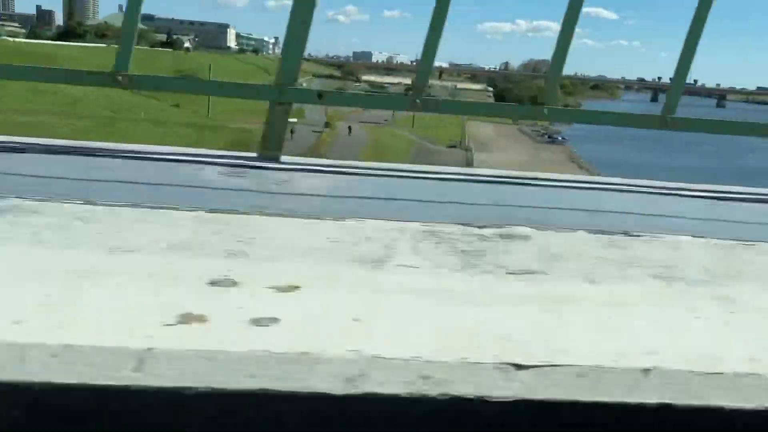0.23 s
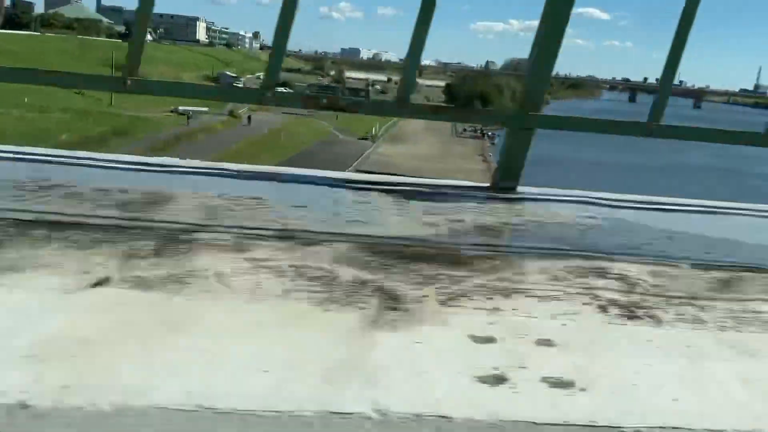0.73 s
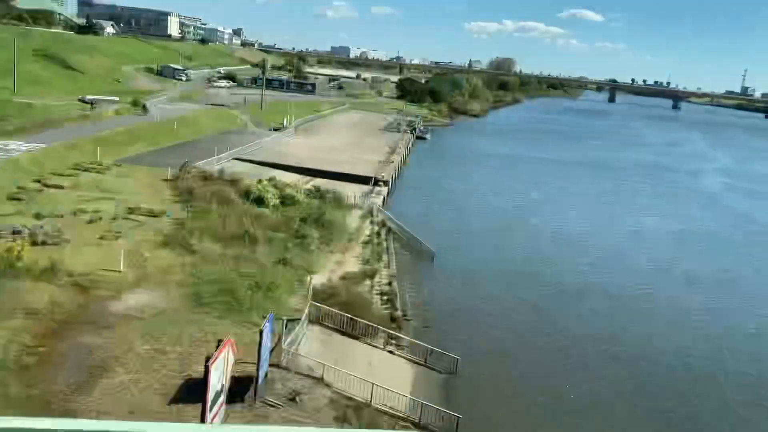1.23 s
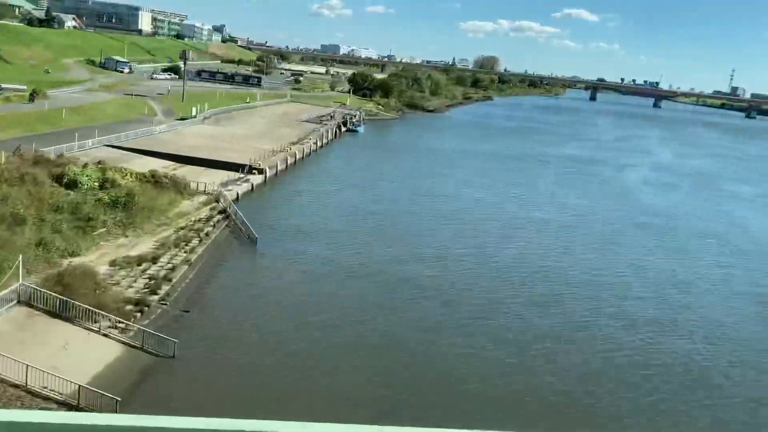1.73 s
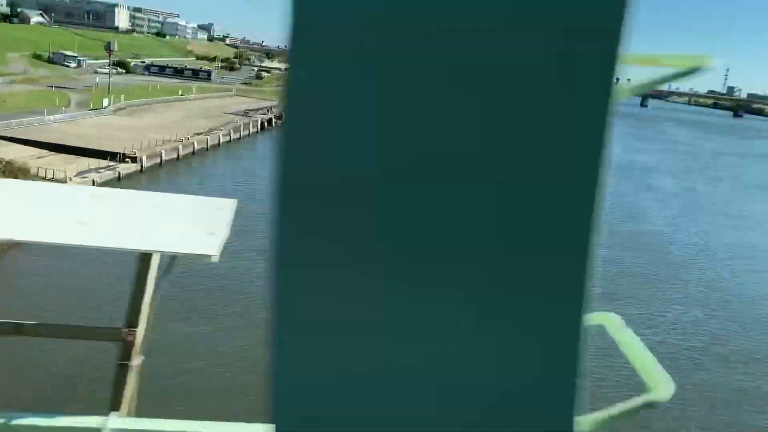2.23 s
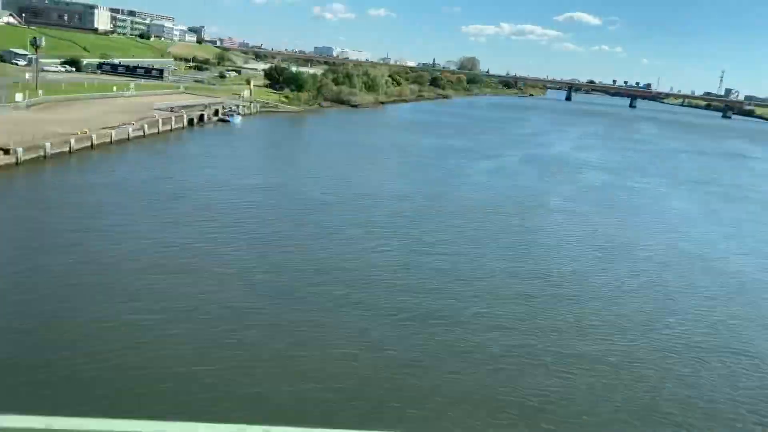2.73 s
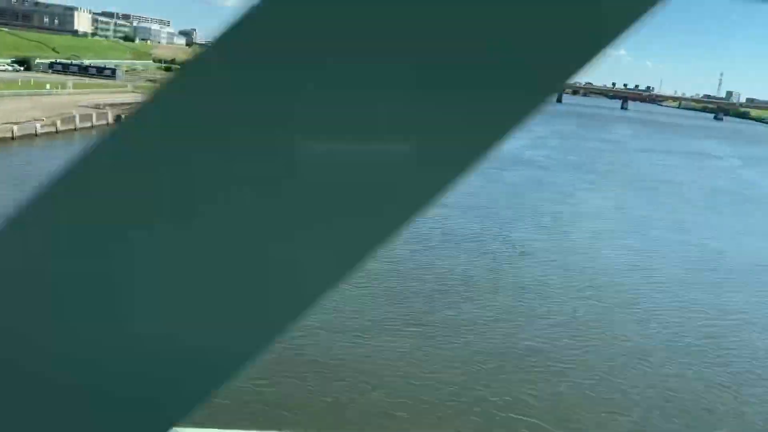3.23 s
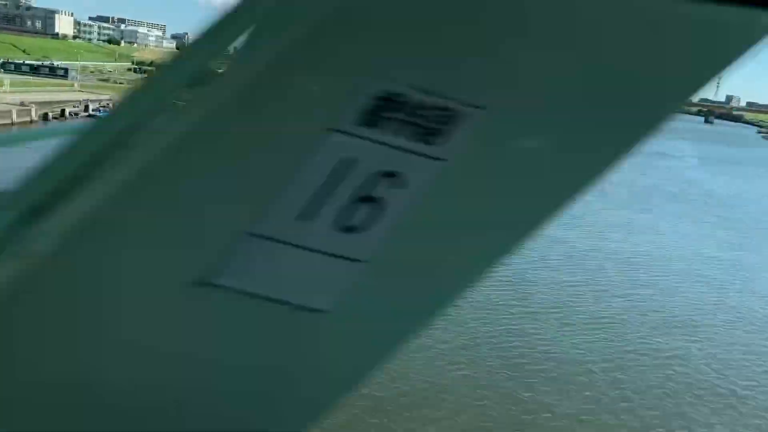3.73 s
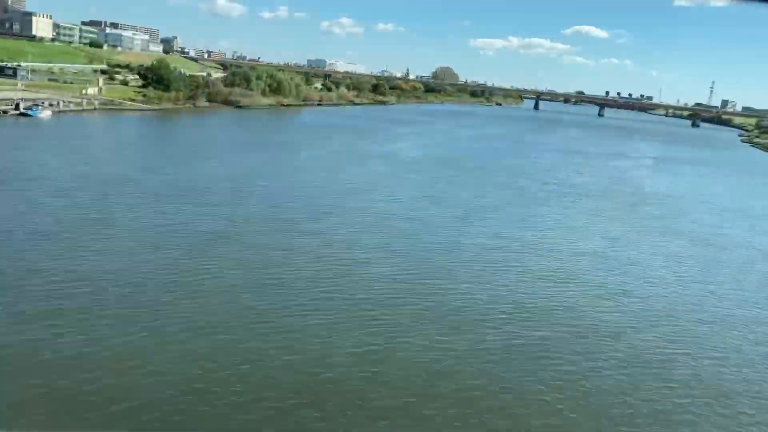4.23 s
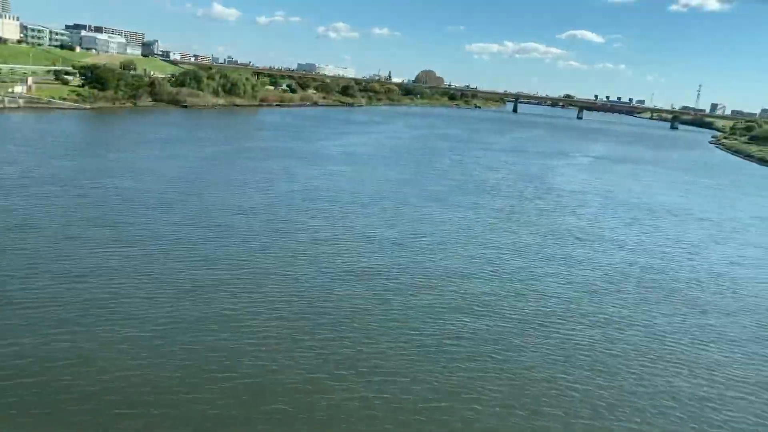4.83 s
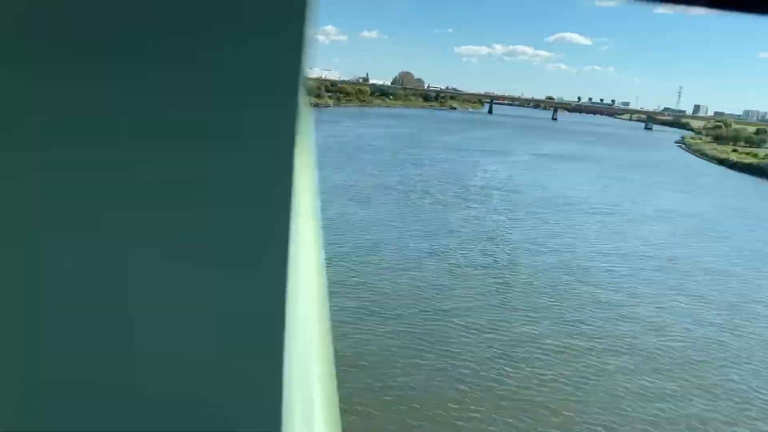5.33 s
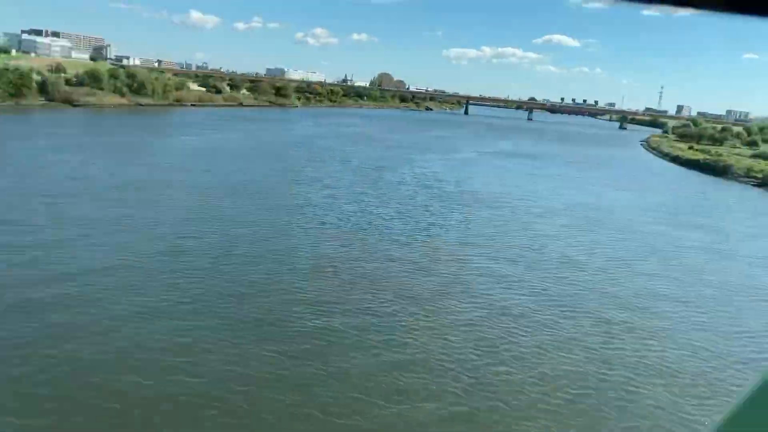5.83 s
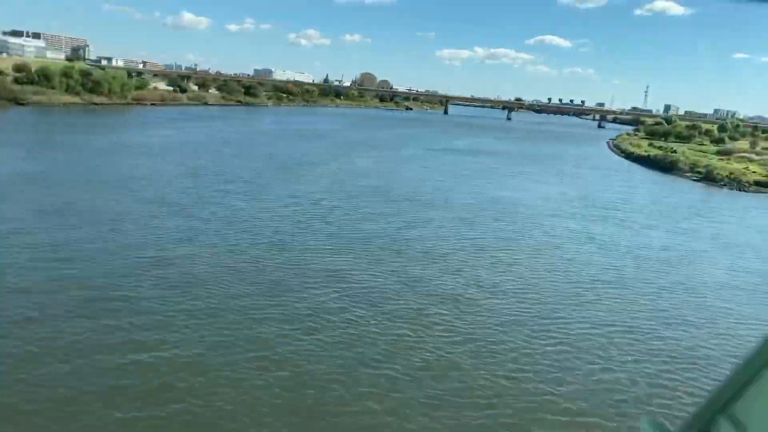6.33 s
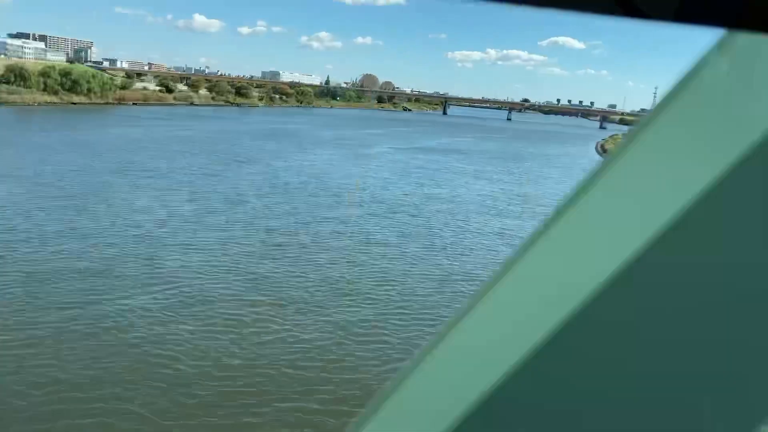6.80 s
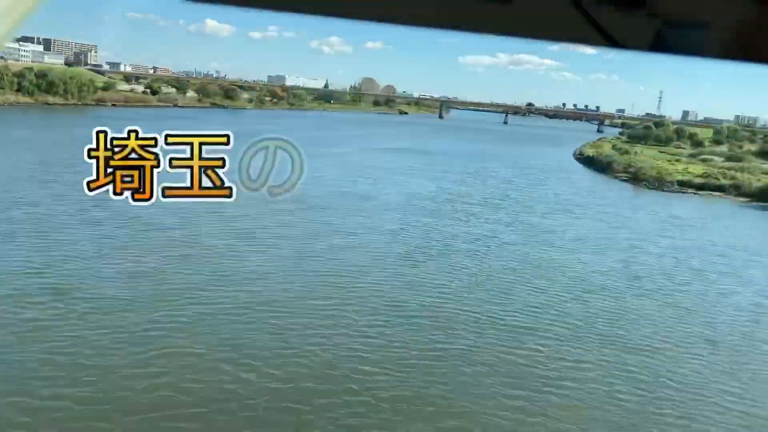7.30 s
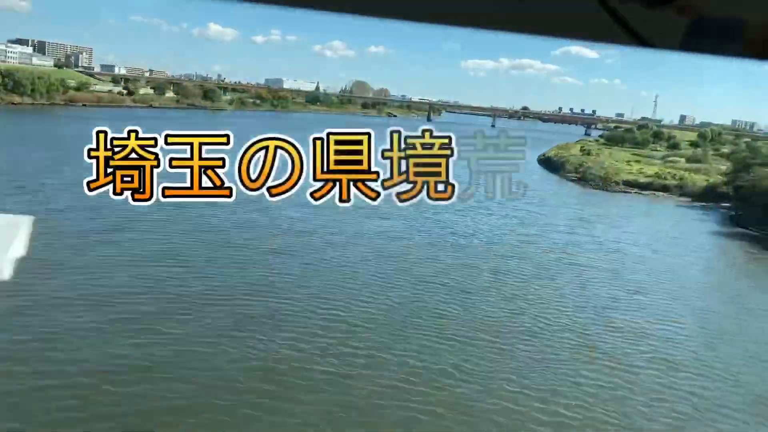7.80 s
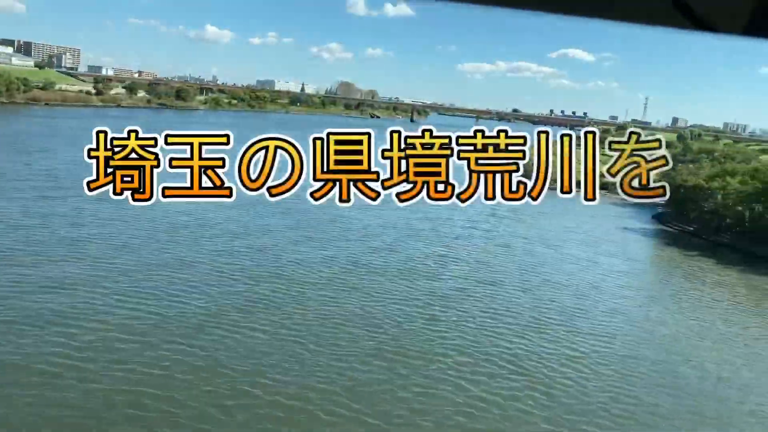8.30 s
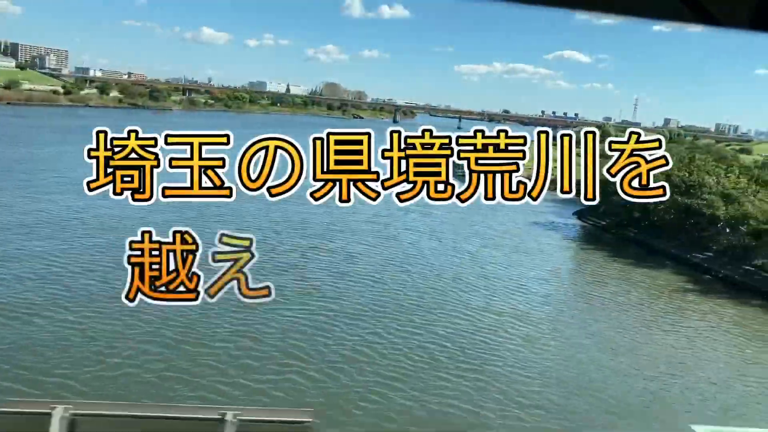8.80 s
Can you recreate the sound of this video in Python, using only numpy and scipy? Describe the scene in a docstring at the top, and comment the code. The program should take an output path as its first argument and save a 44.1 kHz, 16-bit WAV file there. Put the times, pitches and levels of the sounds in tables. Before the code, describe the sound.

Inside a train crossing a steel bridge: loud deep rumble, paired heavy wheel thumps over rail joints, clattering metal and ringing girders throughout.

```python
"""Train on a steel truss bridge

Heard inside the carriage by a two-port microphone: wheels roll on rough rail and shake girders and car body,
as noise shaped in narrow bands. Axles strike the rail joints, and the steelwork fills with each blow and rings on;
damped sines give panel knocks, booms, jolts and soft tonal swells; noise bursts in resonators give clatter.
Now and then a thin hiss rises in the treble, as gliding narrow bands of noise."""
import sys
import numpy as np
from scipy import signal
from scipy.fft import rfft, irfft, next_fast_len
from scipy.io import wavfile
from scipy.ndimage import uniform_filter1d, map_coordinates

SR = 44100
rng = np.random.default_rng(int(sys.argv[2]) if len(sys.argv) > 2 else 0)


def transcribe(u):
    """Save the signal u as a 16-bit wav file named by the first command-line argument.

    u: samples, shape (n,) or (channels, n), limited to [-1, 1]; the rate is SR.
    q: integer samples, one column per channel.
    """
    v = np.clip(np.atleast_2d(u).T, -1, 1)
    q = np.round(v * 32767).astype(np.int16)
    wavfile.write(sys.argv[1], SR, q)


def to_linear_factor(level_db):
    """Convert decibel levels (scalar or array-like) to linear amplitude factors."""
    exponent = np.asarray(level_db, float) / 20
    return 10 ** exponent


N = 399295

# bands of car body, girders, deck, rails, wheel treads, fittings: low_hz, high_hz
PARTS = np.array([(40, 90), (90, 180), (200, 500), (700, 1600), (2500, 6000), (9800, 12000)])
# axles over rail joints: start_s, thud_db, crack_db, fittings_rattle_db
JOINTS = [(0.031, -22, -47.5, -55.5), (0.1293, -19, -43, -59.5), (0.5946, -19.5, -40, -52),
          (0.679, -18.5, -50, -58.5), (0.738, -49, -41, -59), (0.848, -35, -46, -58),
          (1.027, -14.5, -44, -55), (1.117, -14, -44, -50.5), (1.587, -17, -39.5, -54),
          (1.6866, -36, -43, -60.5), (1.868, -28.5, -50.5, -62), (1.961, -21.5, -65, -71),
          (2.0674, -17.5, -45.5, -60), (2.15, -14, -42.5, -55), (2.6212, -14, -38, -56),
          (2.717, -17.5, -40, -56), (2.883, -24.5, -48.5, -64), (2.979, -19.5, -48.5, -68),
          (3.0945, -17, -45, -57), (3.1801, -19.5, -40, -54), (3.646, -14.5, -42, -55),
          (3.75, -49, -46, -58.5), (4.13, -15.5, -43, -56.5), (4.209, -19, -42, -54.5),
          (4.6811, -14.5, -41.5, -60), (4.7698, -21, -44, -60), (4.955, -18.5, -48, -71),
          (5.0545, -20.5, -51, -76), (5.1548, -35, -40, -62), (5.237, -15.5, -39.5, -56),
          (5.7154, -15, -38.5, -60), (5.8094, -15.5, -42.5, -58), (5.9935, -24, -44, -75),
          (6.189, -14, -40.5, -63), (6.278, -14, -40, -57), (6.6974, -27, -45, -63.5),
          (6.752, -16.5, -37.5, -53.5), (6.8457, -21, -41, -60.5), (7.017, -30.5, -46, -65),
          (7.164, -21, -49, -71), (7.244, -18, -44, -61), (7.321, -18, -44, -61),
          (7.796, -18.5, -38.5, -57.5), (7.888, -20.5, -44, -64), (8.058, -24, -48, -59),
          (8.28, -16.5, -39, -51.5), (8.363, -17.5, -36.5, -51), (8.738, -19, -53.5, -69),
          (8.845, -14, -35, -49), (8.947, -20.5, -40, -54.5)]
# spectral slope of the steelwork: pitch_hz, density_db (per Hz, relative)
STEEL = [(25, -3), (36, -5.5), (52, 6.5), (100, 1), (200, -6.5), (420, -9.5), (540, -12.5), (1000, -21),
         (1500, -28), (2200, -31), (3200, -38.5), (5000, -41.5), (6500, -46.5), (9000, -45.5),
         (12000, -50.5), (14500, -62), (16000, -74)]
# broad resonances of the steelwork: pitch_hz, width_hz, peak_db
GIRDER_PEAKS = [(62, 32, 5), (136, 49, 7.5), (245, 57, 3), (417, 10.6, 3), (4230, 1400, 4.5)]
# growth and decay of a blow: pitch_hz, rise_s, ring_t30_s, tail_t30_s, tail_db (t30: time to fall 30 dB)
RING = [(130, 0.028, 0.41, 1, -10.5), (216, 0.043, 0.75, 1.8, -11), (800, 0.035, 0.32, 0.62, -14),
        (4030, 0.015, 0.32, 0.87, -17.5), (10900, 0.014, 0.23, 2.9, -17.5)]
# the two microphone ports: pitch_hz, likeness (0 to 1), right_lead_rad, left_minus_right_db
PORTS = [(40, 0.69, 0.4, -3), (71, 0.99, 0.32, 0), (140, 0.87, 0.26, 2), (250, 0.8, 0.5, -0.5),
         (396, 0.31, 0.5, 2), (490, 0.34, 1.5, 0.5), (532, 0.42, 3.5, 1), (710, 0.3, 1.5, 2.5),
         (1020, 0.64, 2, 0.4), (1790, 0.14, 3.5, 2), (3050, 0.13, 5.5, 1), (4000, 0, 29.5, 2),
         (5700, 0.3, 11, -0.5), (5520, 0.95, 10, 0), (15700, 1, 25.5, 0)]
# rolling noise of each part: level_db, roughness_share (dB per dB), approach_span_offset_db
ROLLING = [(-24, 0.24, 4.5), (-23, 1.1, -2.5), (-23, 0.96, -2.5), (-33, 0.77, -1), (-52.5, 0.49, 5.5),
           (-72, 1.3, 3)]
# rail roughness under the wheels: time_s, level_db
ROUGHNESS = [(0.0, -1.5), (0.45, -0.5), (1.06, 3.5), (1.36, -1), (2.19, 2.5), (2.4, -1.5), (4.2, 2),
             (4.46, 0), (5.14, 2), (5.47, -1.5), (6.83, 0.5), (7.49, -2.5), (9.05, -1)]
# deck panel modes: pitch_hz, relative_db, t60_s
PANEL = [(203.4, -1.5, 0.14), (228, -8.5, 0.097), (281.3, -2, 0.17), (281.8, -4.5, 0.46), (340, -11, 0.16),
         (412, -12, 0.4), (483.7, 5.5, 0.16)]
# hiss swells: start_s, length_s, from_hz, to_hz, width_hz, level_db
SWELLS = [(.61, .27, 7600, 7900, 900, -57.5), (0.621, 0.62, 4630, 4250, 1500, -48.5),
          (.93, 0.33, 11350, 11700, 450, -68), (3.83, 0.33, 11550, 11950, 400, -63),
          (6.34, 0.37, 11700, 11400, 350, -66)]
# short hollow knocks over the approach span: start_s, level_db
HOLLOW_KNOCKS = [(.125, -10), (.176, -14), (.686, -5)]
# modes of the hollow knocks: pitch_hz, relative_db, t60_s
HOLLOW_MODES = [(491, 1, 0.11), (764, -10, 0.12)]
# surges of deep girder modes: start_s, peak_db, pitch_hz
BOOMS = [(1.812, -19.5, 130), (1.88, -19, 128.5), (3.63, -12, 140), (4.62, -14, 143.5), (7.262, -14.5, 140),
         (8.93, -12, 140)]
# short dull jolts through the floor: start_s, peak_db, pitch_hz
JOLTS = [(1.239, -9.5, 258), (2.614, -9, 290), (2.917, -13.5, 232), (3.231, -10, 293), (6.052, -8, 296),
         (8.239, -11, 419), (8.374, -7.5, 315), (8.734, -16.5, 264), (8.857, -5, 310)]
# brief soft tonal swells at single pitches in the rumble: start_s, peak_db, pitch_hz
TONAL_SWELLS = [(.13, -11, 51), (.378, -16, 64.5), (.772, -14, 54), (2.075, -14.5, 255.6), (2.19, -13, 348),
                (3.175, -20.5, 488), (3.26, -16, 66.4), (5.0, -17, 594), (6.805, -14.5, 417),
                (8.358, -20, 662), (8.37, -23.5, 785), (8.845, -29, 988), (8.855, -20, 700)]
# resonances that the clatter rings in rail and wheel: pitch_hz, width_hz, gain_db
RAIL = [(800, 110, -2), (970, 160, 12), (1220, 130, -7), (2350, 810, -5)]

SIZE = next_fast_len(N)
FREQ = np.fft.rfftfreq(SIZE, 1 / SR)
STEP = 32  # samples between control values
PART_HZ = np.sqrt(np.prod(PARTS, axis=1))  # geometric centre of each part's band
# the approach span gives way to the truss
TRUSS_FROM_S, CHANGE_S = 1.4, 0.08
# a middling blow, and the levels at which it drives girders and rails
USUAL_THUD_DB, USUAL_CRACK_DB = -18, -43
GIRDER_BLOW_DB, RAIL_BLOW_DB, RAIL_CRACK_SHARE = -22, -27, 0.87
# clatter after a blow: loudest tick above the crack level, mean delay
CLATTER_DB, CLATTER_S = 16, 0.025
# loose clatter while rolling: mean ticks a second, loudest tick
LOOSE_PER_S, LOOSE_DB = 250, -29.5


def train(sway_db=1.17, flicker_db=1.0, clatter_db=0.25):
    """Filter-bank synthesis: quarter-octave bands of noise on two unrelated paths, driven by rolling plus blows."""
    count = N // STEP + 2
    time_s = np.arange(count) * STEP / SR
    roll_db = rolling(time_s)
    source = rfft(waking_modes(), SIZE) * steel_colour()
    # wheel and rail chatter: one rough gain for the blows in every band
    clatter = to_linear_factor(2 * clatter_db * walk(110, count))
    octave = np.log2(np.maximum(FREQ, 1))
    shared, out = walk(3.3, count), 0
    for hz in 27 * 2 ** (np.arange(38) / 4):
        place = np.interp(np.log(hz), np.log(PART_HZ), np.arange(len(PARTS)))
        low = min(int(place), len(PARTS) - 2)
        level_db = roll_db[low] + (place - low) * (roll_db[low + 1] - roll_db[low])
        # neighbouring bands sway together, each flickers alone
        shared = 0.2 * shared + 0.29 * walk(11, count)
        wander_db = sway_db * shared + flicker_db * walk(20, count)
        power = (to_linear_factor(2 * level_db) + blows(hz, count) * clatter) * to_linear_factor(2 * wander_db)
        band = np.cos(np.pi / 2 * np.clip(4 * (octave - np.log2(hz)), -1, 1)) ** 2
        envelope = np.interp(np.arange(N), np.arange(count) * STEP, np.sqrt(power))
        out = out + irfft(source * band, SIZE)[:, :N] * envelope
    return out


def rolling(time_s):
    """Roughness excitation: rougher rail raises each part's level in dB; the approach span offsets it."""
    level_db, share, approach_db = np.transpose(ROLLING)[:, :, None]
    approach = 1 / (1 + np.exp((time_s - TRUSS_FROM_S) / CHANGE_S))
    roughness_db = np.interp(time_s, *np.transpose(ROUGHNESS))
    return level_db + share * roughness_db + approach_db * approach


def blows(hz, count, spot_db=0.5, low_hz=102.0, even_hz=700.0, thud_lead_s=0.014):
    """Impact excitation: the power that joint blows put into the band at hz, in a first ring and a tail."""
    start_s, deck_db, treads_db, fittings_db = np.transpose(JOINTS)
    thud_db, crack_db = deck_db - USUAL_THUD_DB, treads_db - USUAL_CRACK_DB
    girders_db = GIRDER_BLOW_DB + thud_db
    rails_db = RAIL_BLOW_DB + RAIL_CRACK_SHARE * crack_db + (1 - RAIL_CRACK_SHARE) * thud_db
    parts_db = np.c_[girders_db, deck_db, rails_db, treads_db, fittings_db]
    blow_db = np.array([at(hz, np.c_[PART_HZ[1:], row]) for row in parts_db])
    # every joint sits on another spot of the bridge and wakes other low modes
    lowness = 1 / (1 + hz / even_hz)
    blow_db = blow_db + spot_db * lowness * rng.standard_normal(len(start_s))
    kicks = np.zeros(count)
    index = np.minimum(start_s * SR / STEP, count - 1).astype(int)
    np.add.at(kicks, index, to_linear_factor(2 * blow_db))
    rise_s, ring_t30_s, tail_t30_s, tail_db = (at(hz, RING, column=c) for c in (1, 2, 3, 4))
    # the steel takes a moment to fill with sound
    swell = np.hanning(2 * max(int(rise_s * SR / STEP), 1) + 2)
    swell = swell * np.linspace(1, 0.4, len(swell))
    # the thud runs ahead through the car frame; the treble comes round through the air
    early = int(thud_lead_s * lowness * SR / STEP)
    push = np.convolve(kicks, np.r_[swell, np.zeros(early)] / swell.sum())
    push = push[len(swell) // 4 + early:][:count]
    ringing = fade(push, ring_t30_s) + to_linear_factor(2 * tail_db) * fade(push, tail_t30_s)
    return ringing / (1 + (low_hz / hz) ** 6)


def waking_modes(mode_db=3.0, gap_hz=69.66, life_s=.12, calm_hz=230.0):
    """Modal excitation by a moving load: narrow modes wake and sleep in noise as the wheels move along."""
    hz, time_s, spectrum = signal.stft(rng.standard_normal((2, SIZE)), SR, nperseg=2048)
    chance = rng.standard_normal((600, 200))
    grid = np.meshgrid(hz / gap_hz, time_s / life_s, indexing="ij")
    field = map_coordinates(chance, grid, order=3, mode="wrap")
    # the heavy girders answer more evenly
    swing_db = mode_db * field / (1 + (calm_hz / np.maximum(hz, 1)[:, None]) ** 2)
    noise = signal.istft(spectrum * to_linear_factor(swing_db), SR, nperseg=2048)[1][:, :SIZE]
    return noise / noise.std()


def steel_colour():
    """Resonant transmission: gain of the steelwork with broad peaks, levelled to about rms 1 in every part."""
    peaks_db = sum(db / (1 + (2 * (FREQ - hz) / width) ** 2) for hz, width, db in GIRDER_PEAKS)
    gain = to_linear_factor(at(FREQ, STEEL) + peaks_db)
    power = [gain[(FREQ > low) & (FREQ < high)] ** 2 for low, high in PARTS]
    part_db = [10 * np.log10(2 * p.sum() / SIZE) for p in power]
    return gain / to_linear_factor(at(FREQ, np.c_[PART_HZ, part_db]))


def knocks(panel_db=-7.5, spot_db=3.0, detune=0.037, rise_s=0.0074, lead_s=0.00972):
    """Modal superposition: each blow rings the deck panels as damped sines; every spot favours other modes."""
    out, t = np.zeros((2, N + SR)), np.arange(SR // 3) / SR
    hz, mode_db, t60_s = np.transpose(PANEL)[:, :, None]
    shape = (1 - np.exp(-t / rise_s)) * np.exp(-np.log(1000) * t / t60_s)
    chance = rng.standard_normal((len(JOINTS), 4, len(PANEL), 1))
    for (start_s, thud_db, *_), (size, pitch, *turn) in zip(JOINTS, chance):
        ring = to_linear_factor(thud_db + panel_db + mode_db + spot_db * size) * shape
        # each channel has its own random phases
        turns = hz * (1 + detune * pitch) * t + np.array(turn)
        note = (ring * np.sin(2 * np.pi * turns)).sum(axis=1)
        out[:, max(int((start_s - lead_s) * SR), 0):][:, :len(t)] += note
    return out[:, :N]


def crunch(count=40, smear_s=0.0012):
    """Shot noise in resonators: ticks thin out after each blow, over a loose patter, and ring rail and wheel."""
    start_s, _, crack_db, _ = np.transpose(JOINTS)[:, :, None]
    wait, size = rng.random((2, len(JOINTS), count))
    tick_s = start_s - CLATTER_S * np.log(1 - .999 * wait)
    ticks = np.zeros(N + SR)
    np.add.at(ticks, (tick_s * SR).astype(int), to_linear_factor(crack_db + CLATTER_DB) * size ** 2)
    loose = rng.random(N) < LOOSE_PER_S / SR
    ticks[:N] += loose * to_linear_factor(LOOSE_DB) * rng.random(N) ** 2
    # each tick becomes a brief burst of noise
    envelope = signal.lfilter([1], [1, -np.exp(-1 / (smear_s * SR))], ticks[:N])
    bursts = envelope * rng.standard_normal((2, N))
    out = 0
    for hz, width_hz, gain_db in RAIL:
        edges = (hz - width_hz / 2, hz + width_hz / 2)
        resonator = signal.butter(2, edges, "band", fs=SR, output="sos")
        out = out + to_linear_factor(gain_db) * signal.sosfilt(resonator, bursts)
    return out


def rings(events, rise_s, t60_s):
    """Exponential damping: one sine for each row, rising fast and dying away."""
    out, t = np.zeros(N + SR), np.arange(SR // 2) / SR
    shape = (1 - np.exp(-t / rise_s)) * np.exp(-np.log(1000) * t / t60_s)
    for (start_s, peak_db, hz), turn in zip(events, rng.random((len(events), 1))):
        note = shape / shape.max() * np.sin(2 * np.pi * (hz * t + turn))
        out[int(start_s * SR):][:len(t)] += to_linear_factor(peak_db) * note
    return out[:N]


def hollow(rise_s=0.01):
    """Modal ringing: a few short hollow knocks, each a sum of the same two damped modes."""
    out, t = np.zeros(N), np.arange(SR // 4) / SR
    hz, mode_db, t60_s = np.transpose(HOLLOW_MODES)[:, :, None]
    phases = 2 * np.pi * rng.random((len(HOLLOW_KNOCKS), len(HOLLOW_MODES), 1))
    for (start_s, level_db), phase in zip(HOLLOW_KNOCKS, phases):
        decay = np.exp(-np.log(1000) * t / t60_s)
        ring = to_linear_factor(level_db + mode_db) * decay * np.sin(2 * np.pi * hz * t + phase)
        out[int(start_s * SR):][:len(t)] += (1 - np.exp(-t / rise_s)) * ring.sum(axis=0)
    return out


def hiss(patchy_db=3.0, edge_db_per_s=200):
    """Modulated carrier: slow noise on a gliding tone makes patchy narrow bands that fade in, hold and fade out."""
    t = np.arange(N) / SR
    patches = to_linear_factor(patchy_db * np.repeat(walk(28, N // STEP + 1), STEP)[:N])
    noise, out = rng.standard_normal((2, N)), 0
    for start_s, length_s, from_hz, to_hz, width_hz, level_db in SWELLS:
        slow = signal.sosfilt(signal.butter(2, width_hz / 2, fs=SR, output="sos"), noise)
        hz = from_hz + (to_hz - from_hz) * np.clip((t - start_s) / length_s, -.5, 1.5)
        outside_s = np.maximum(0, np.maximum(start_s - t, t - start_s - length_s))
        carrier = np.exp(2j * np.pi * np.cumsum(hz) / SR)
        band = np.real((slow[0] + 1j * slow[1]) * carrier) / slow.std()
        out = out + to_linear_factor(level_db - edge_db_per_s * outside_s) * band
    return patches * out


def at(hz, table, column=1):
    """Logarithmic frequency scale: a table column read between its rows."""
    table = np.asarray(table, float)
    return np.interp(np.log(np.maximum(hz, 1)), np.log(table[:, 0]), table[:, column])


def walk(rate, count):
    """Random modulation: control levels held 1 / rate s, then smoothed twice; spread 1."""
    hold = max(int(SR / STEP / rate), 1)
    levels = np.repeat(rng.standard_normal(count // hold + 1), hold)
    levels = uniform_filter1d(uniform_filter1d(levels, hold), hold)[:count]
    return levels / levels.std()


def fade(power, t30_s):
    """Exponential energy decay: each control value of power falls to a thousandth, 30 dB, in t30_s."""
    return signal.lfilter([1], [1, -np.exp(-np.log(1000) * STEP / SR / max(t30_s, .01))], power)


def scene():
    """Superposition on two paths: unrelated noise on each, hiss and single notes on the first, hollow on both."""
    notes = rings(BOOMS, rise_s=0.018, t60_s=0.56)
    notes = notes + rings(JOLTS, rise_s=0.0023, t60_s=0.061)
    notes = notes + rings(TONAL_SWELLS, rise_s=.02, t60_s=0.38)
    first_only = np.array([[1], [0]])
    return train() + knocks() + crunch() + (hiss() + notes) * first_only + hollow()


def band_limit(x):
    """A steep low-pass at the top of the band."""
    return signal.sosfilt(signal.butter(12, 15750, fs=SR, output="sos"), x)


def record(dry):
    """Partial coherence: the right port shares part of the left's sound, leading in phase; low cut, rounded peaks."""
    like, pan_db = np.clip(at(FREQ, PORTS), 0, 1), at(FREQ, PORTS, column=3)
    lead_rad = np.interp(FREQ, *np.transpose(PORTS)[[0, 2]])
    left, other = rfft(dry, SIZE)
    right = like * np.exp(1j * lead_rad) * left + np.sqrt(1 - like ** 2) * other
    ports = irfft([left * to_linear_factor(pan_db / 2), right * to_linear_factor(-pan_db / 2)], SIZE)[:, :N]
    # low cut at 25 Hz
    ports = signal.sosfilt(signal.butter(2, 25, "high", fs=SR, output="sos"), ports)
    mix = np.tanh(0.44 * ports) / 0.45
    return band_limit(mix)


dry = scene()
out = record(dry)
transcribe(out)
```